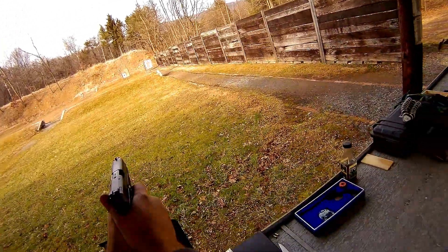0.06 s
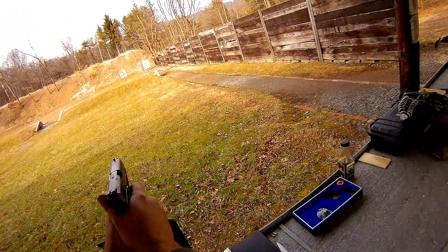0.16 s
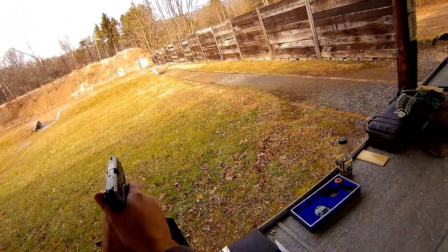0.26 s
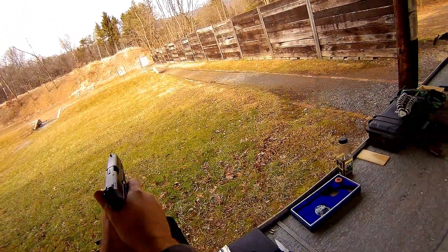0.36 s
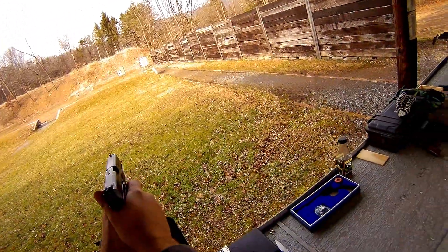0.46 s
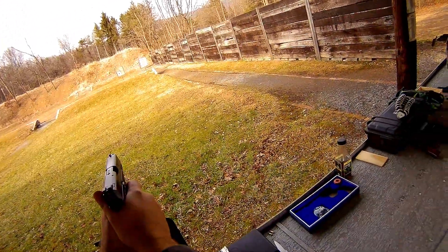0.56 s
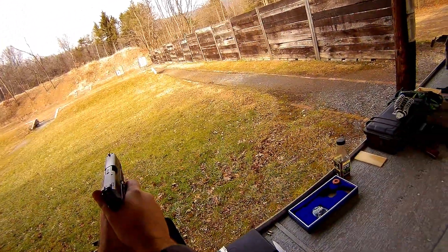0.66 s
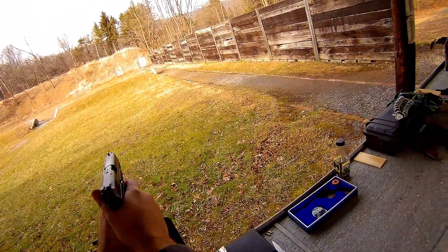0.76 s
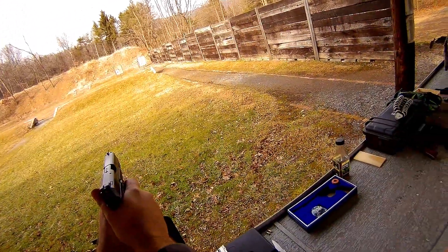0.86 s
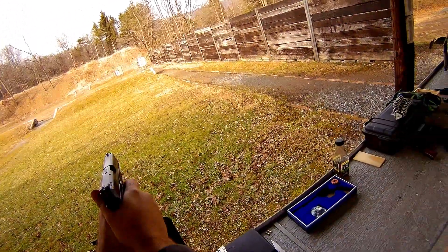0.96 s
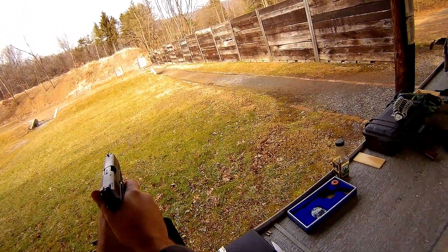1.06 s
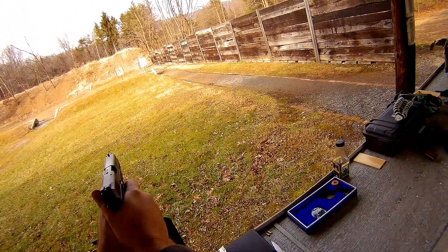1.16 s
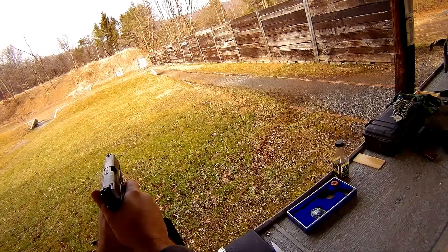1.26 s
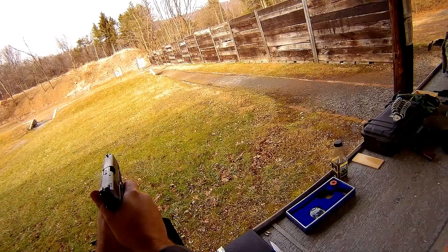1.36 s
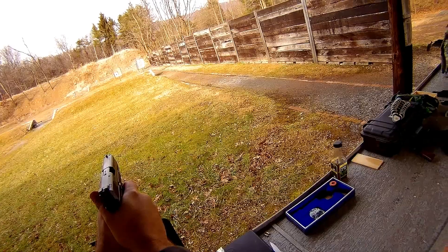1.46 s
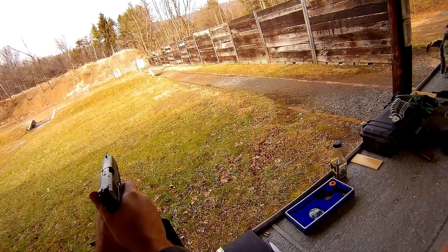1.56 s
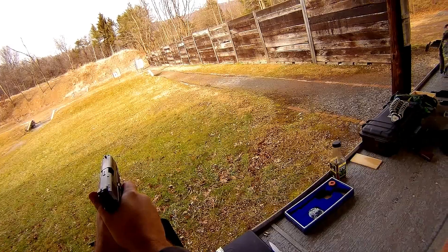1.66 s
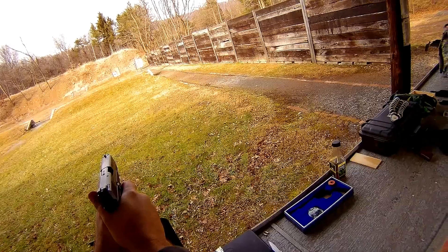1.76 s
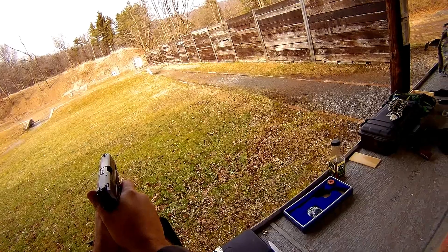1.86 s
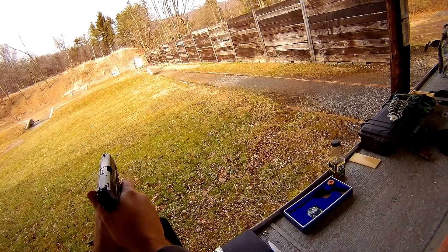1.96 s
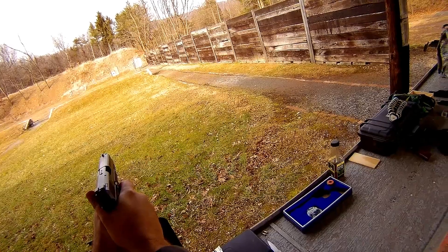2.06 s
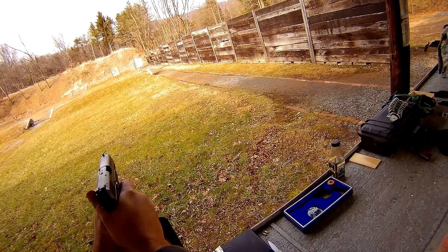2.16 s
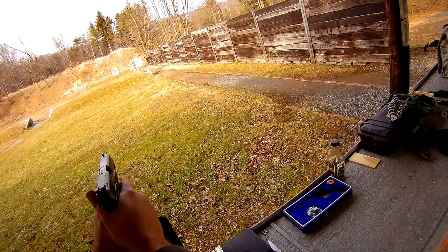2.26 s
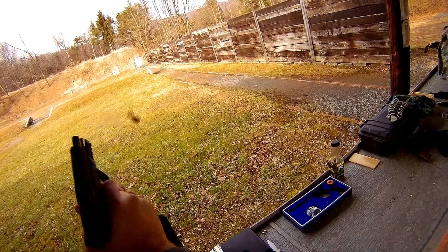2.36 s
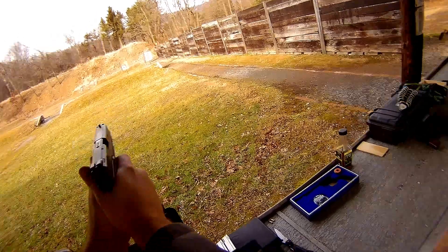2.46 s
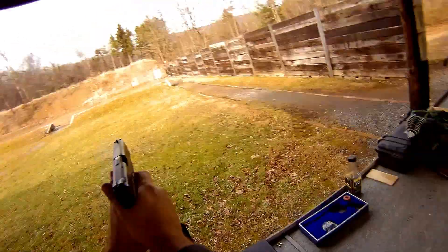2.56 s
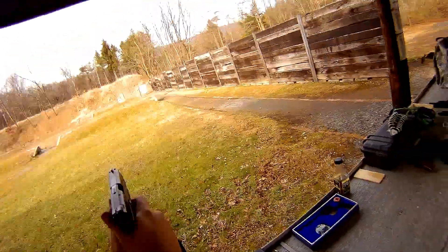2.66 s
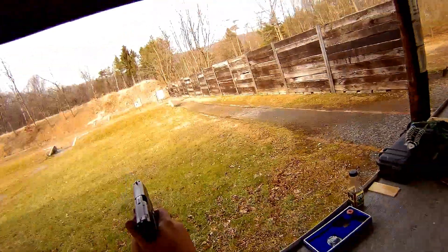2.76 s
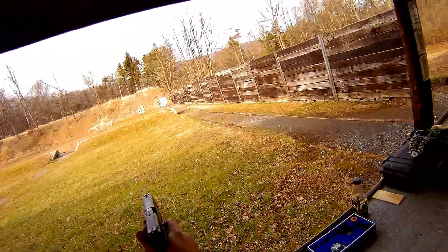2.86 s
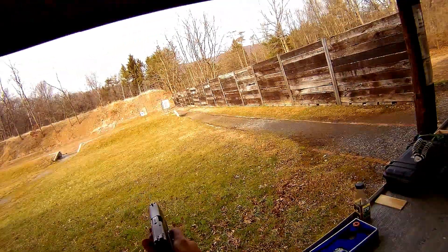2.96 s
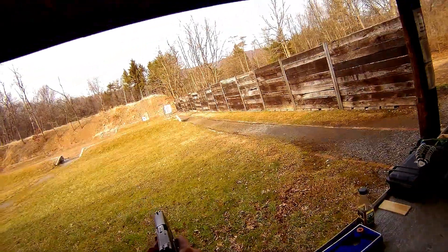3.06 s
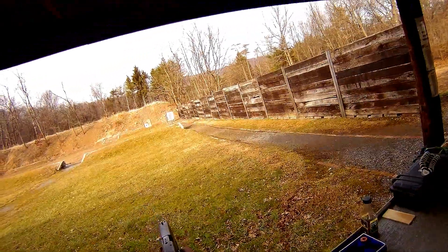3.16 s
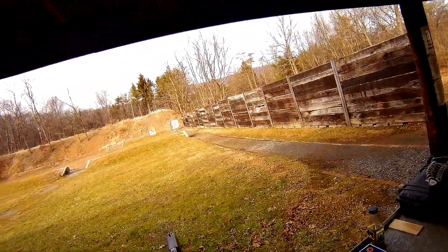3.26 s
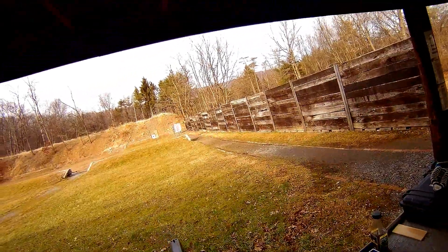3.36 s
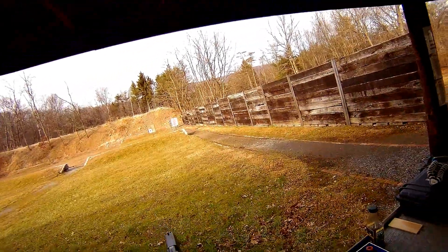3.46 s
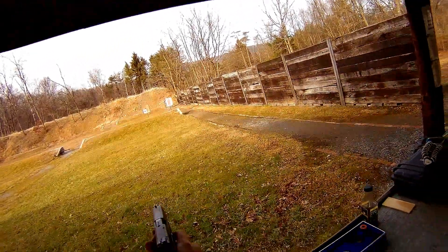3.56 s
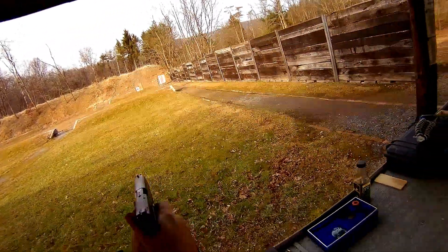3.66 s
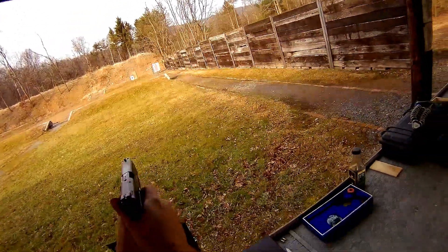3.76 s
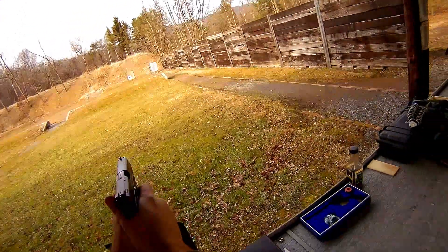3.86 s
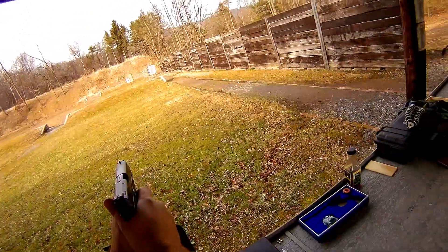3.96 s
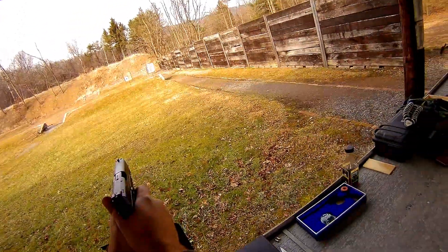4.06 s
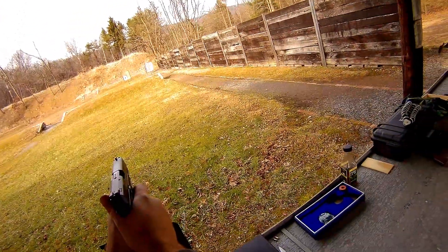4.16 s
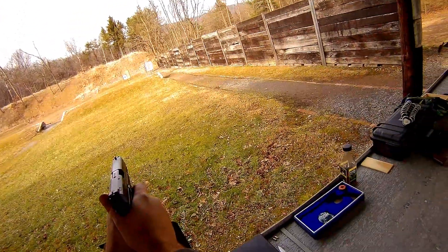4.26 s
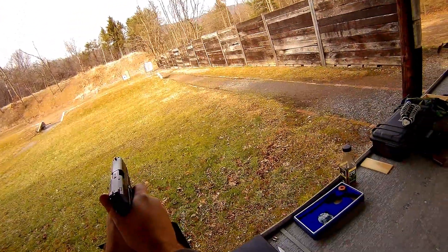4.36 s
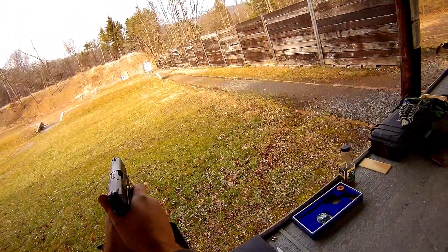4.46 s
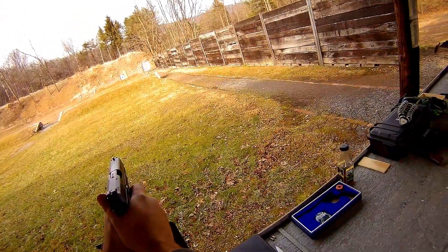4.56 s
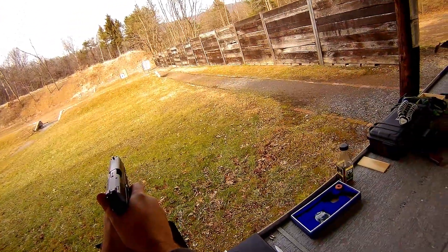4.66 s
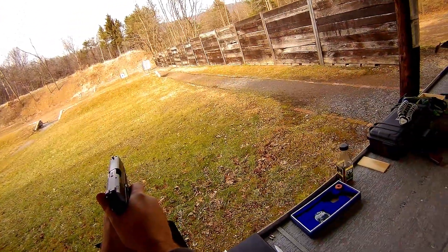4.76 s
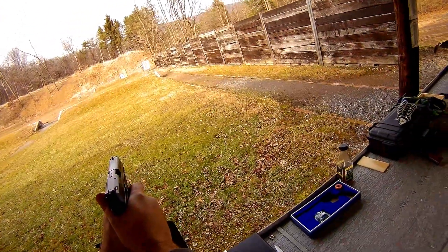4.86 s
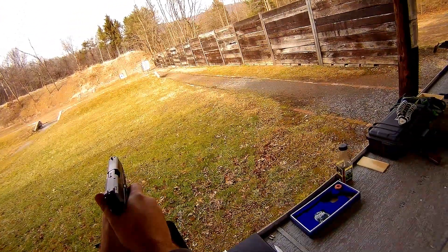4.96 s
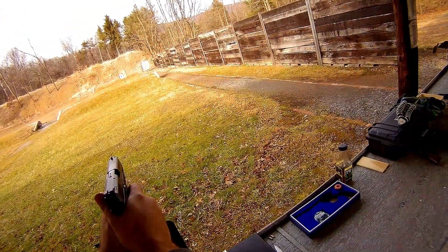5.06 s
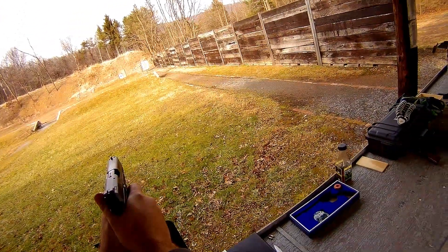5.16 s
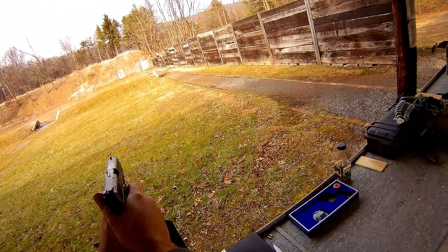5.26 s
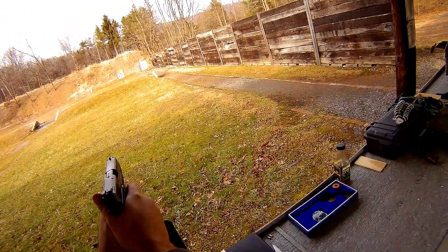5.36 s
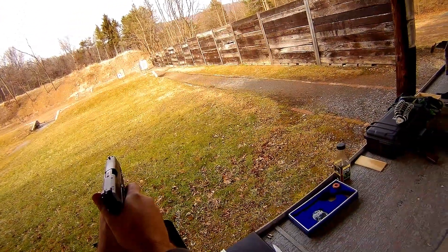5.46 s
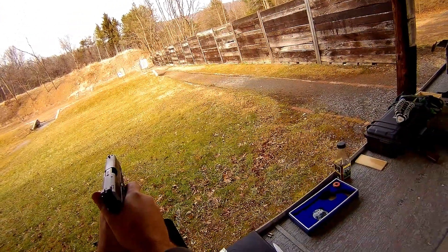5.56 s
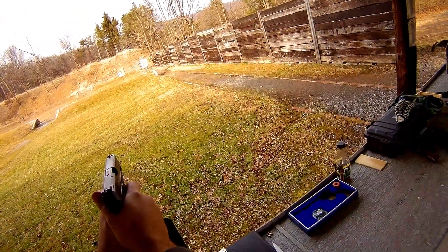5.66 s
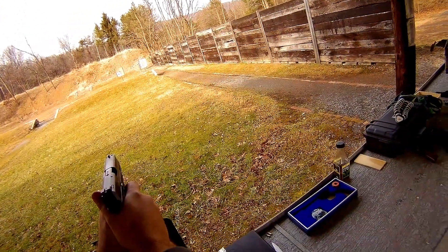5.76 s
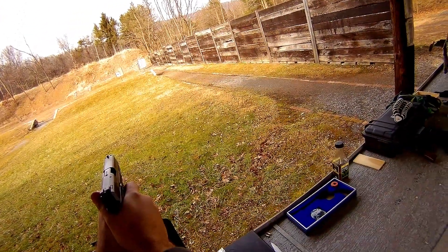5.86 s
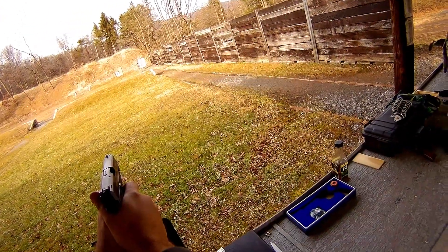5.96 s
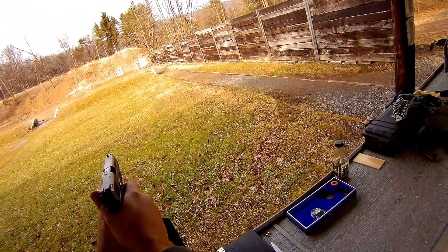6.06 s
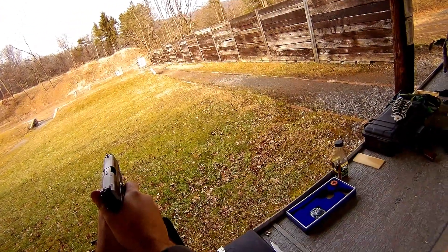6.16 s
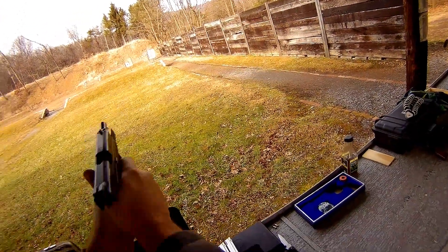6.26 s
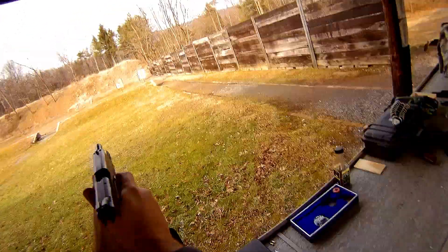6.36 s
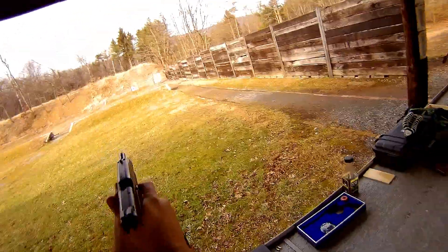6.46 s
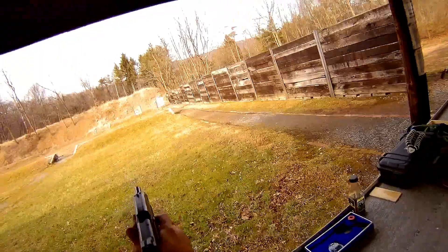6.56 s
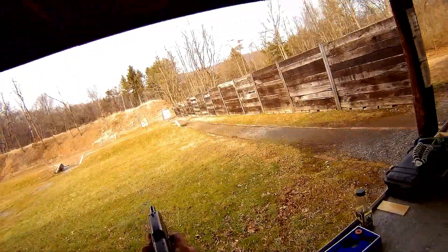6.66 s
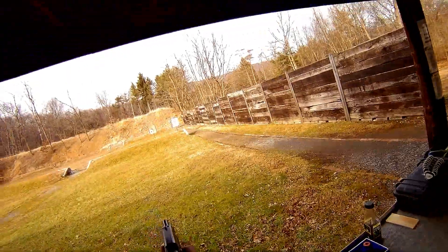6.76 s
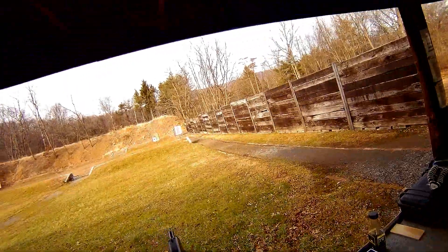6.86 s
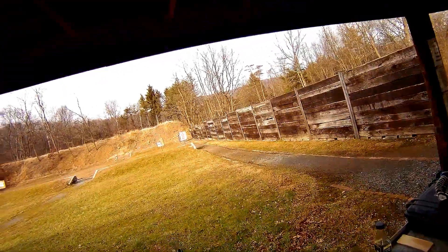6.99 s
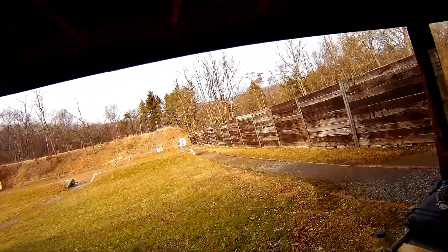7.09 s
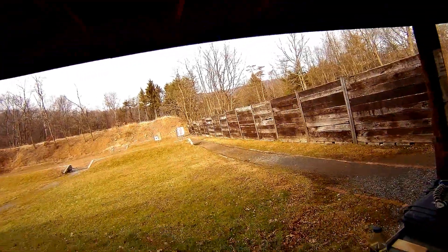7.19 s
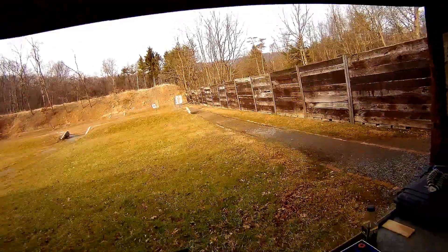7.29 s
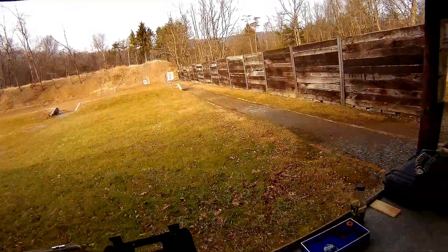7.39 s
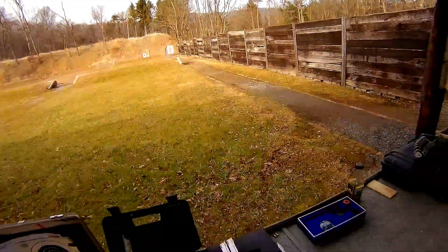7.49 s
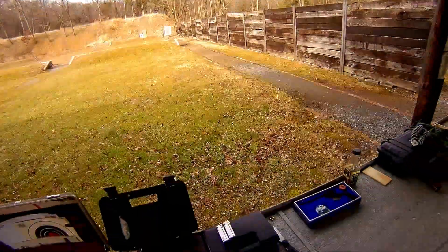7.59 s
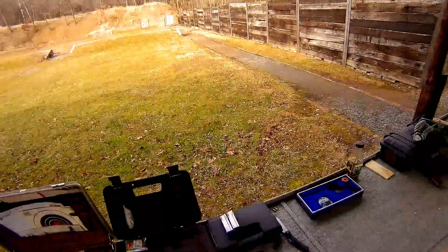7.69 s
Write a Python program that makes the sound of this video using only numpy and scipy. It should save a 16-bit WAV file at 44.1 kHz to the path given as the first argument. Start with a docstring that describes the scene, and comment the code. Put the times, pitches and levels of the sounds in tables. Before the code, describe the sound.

The fading echo of an earlier shot opens the scene at an outdoor range. A brass casing clicks and bounces on concrete during the first second, followed by a faint rattle of loose gear. At about 2.3 seconds a pistol fires close by, a loud, sharp report that overloads the microphone, slaps back from the shelter and fence, and rolls away over the hills for roughly two seconds. A casing clinks lightly between 3 and 4 seconds. From about 4.6 to 5.7 seconds come soft scuffs of shoes and clothing and small knocks over quiet air. A second shot cracks at about 6.2 seconds with the same long echo. As it fades, a casing lands with a sharp click at 7 seconds, a short knock follows at 7.3 with a few small ticks, and gear clatters briefly at about 7.7 seconds.

```python
"""Pistol shots at an outdoor range

Slow single shots, fired from under a roof, overload a head-worn microphone. Each report reflects
from the shelter and a long plank fence, then rolls away, scattered by the wooded hills.
Brass cases strike the concrete and ring in their free modes. Between shots the shooter shifts his
stance and gear clatters, over quiet air and a faint, distant drone."""
import sys
import numpy as np
from scipy import signal
from scipy.fft import rfft, irfft, next_fast_len
from scipy.io import wavfile
from scipy.ndimage import map_coordinates

SR = 44100
rng = np.random.default_rng(int(sys.argv[2]) if len(sys.argv) > 2 else 0)


def store_pcm(level_fs):
    """Save levels as 16-bit WAV."""
    pcm = np.round(np.clip(level_fs, -1, 1) * 32767).astype(np.int16)
    wavfile.write(sys.argv[1], SR, np.atleast_2d(pcm).T)


N = 340878
T = np.arange(N) / SR


def amp(db):
    """Amplitude ratio of a level in decibels."""
    return 10 ** (np.asarray(db) / 20)


def unit(x):
    """Normalisation to an rms of 1."""
    return x / np.sqrt(np.mean(x ** 2) + 1e-20)


def along(points, hz):
    """Interpolation of (frequency [Hz], value) points on a logarithmic frequency axis."""
    freqs, values = np.transpose(points)
    return np.interp(np.log(hz + 1), np.log(freqs + 1), values)


def filtered(x, response):
    """Linear filtering: the spectrum of x times a frequency response."""
    size = next_fast_len(len(x) + SR // 4)
    return irfft(rfft(x, size) * response(np.fft.rfftfreq(size, 1 / SR)), size)[:len(x)]


def noise(spectrum, size=N):
    """Spectral shaping: coloured noise of rms 1."""
    return unit(filtered(rng.standard_normal(size), lambda hz: amp(along(spectrum, hz))))


def wobble(rate, size=N):
    """Random modulation: a smooth curve through `rate` random values a second."""
    return map_coordinates(rng.standard_normal(size // 10), [T[:size] * rate], mode="wrap")


def fading(x, decay):
    """Frequency-dependent damping: each band falls 60 dB in its own decay time (t60)."""
    hz, t, bands = signal.stft(x, SR, nperseg=256)
    loss = amp(-60 * t / along(decay, hz)[:, None])
    return signal.istft(bands * loss, SR, nperseg=256)[1][:len(x)]


def add(track, start_s, x):
    """Superposition of x on the track from a given time."""
    start = round(start_s * SR)
    x = x[max(-start, 0):max(N - start, 0)]
    track[max(start, 0):][:len(x)] += x


def stroke(t, rise, t60):
    """An envelope of linear rise and exponential decay."""
    return np.minimum(t / rise, 1) * amp(-60 * np.maximum(t - rise, 0) / t60)


# Shots; the first precedes the start, so only its echo is heard: (time [s], level [dB])
SHOT_TIMES = [(-1.18, 0), (2.3205, 0), (6.1597, 0)]


def pistol(drift_rad_per_s=.6, terrain_db=.7):
    """Decorrelation: every shot meets the same walls and terrain; moving air alters the long paths."""
    out = np.zeros(N)
    near = muzzle_blast() + fence_boom()
    shared_echo = hill_echo()
    terrain = amp(terrain_db * wobble(rate=22))
    drift = np.minimum(drift_rad_per_s * T, np.pi / 2)
    for start, db in SHOT_TIMES:
        echo = np.cos(drift) * shared_echo + np.sin(drift) * hill_echo()
        add(out, start, amp(db) * (near + terrain * echo))
    return out


# Muzzle blast under the roof: (frequency [Hz], spectral level [dB])
BLAST_SPECTRUM = [(25, -10), (55, -15), (85, -3), (170, -13.5), (280, -5), (420, -3), (570, 3), (1100, -.5),
                  (1400, -.5), (1750, -6), (2300, -10), (3500, -3), (4500, -7), (6200, -5), (8000, -16),
                  (10000, -21), (16000, -23)]
# Reverberation of the shelter: (frequency [Hz], decay time [s])
SHELTER_DECAY = [(60, .24), (300, .19), (600, .168), (1300, .138), (2500, .088), (3800, .066), (6000, .074),
                 (14000, .16)]
# Single reflections from walls and posts: (delay [s], level [dB], pulse width [ms])
REFLECTIONS = [(.0305, 2, .27), (.0355, 2, .27), (.057, -1, .45), (.088, -8, .35), (.1355, -11, .17),
               (.1435, -17, .17), (.169, -19, .17), (.2205, -19, .12), (.245, -21, .15)]


def muzzle_blast(blast_db=9.5, attack_s=.0008, spray_db=3, spray_loss_db_per_ms=90, spray_t60=.018):
    """Reverberation and reflection: the blast fills the shelter; walls and posts return pulses."""
    out = amp(blast_db) * fading(noise(BLAST_SPECTRUM), SHELTER_DECAY) * (1 - np.exp(-T / attack_s))
    t = T[:SR // 8]
    for delay, db, width_ms in REFLECTIONS:
        u = (T - delay) * 1000 / width_ms  # time in pulse widths
        out -= amp(db) * (1 - u * u / 2) * np.exp(-u * u / 4)
        # Rough planks scatter a short spray; a wide, dull pulse scatters less.
        scatter_db = db + spray_db - spray_loss_db_per_ms * width_ms
        add(out, delay, amp(scatter_db - 60 * t / spray_t60) * noise(BLAST_SPECTRUM, len(t)))
    return out


def fence_boom(start_hz=600, end_hz=140, sink_s=.085, width_hz=185, cutoff_hz=98,
               level_db=-26.7, hold_s=.25, t60=1.15):
    """Successive reflection: returns from ever farther along the fence merge into a sinking boom."""
    centre_hz = end_hz + (start_hz - end_hz) * np.exp(-T / sink_s)
    phase = 2 * np.pi * np.cumsum(centre_hz) / SR
    band = wobble(width_hz) * np.cos(phase) + wobble(width_hz) * np.sin(phase)
    # The fence returns no deep bass.
    band = filtered(band, lambda hz: (hz / cutoff_hz) ** 5 / (1 + (hz / cutoff_hz) ** 5))
    flutter = amp(2 * wobble(rate=35))
    envelope = amp(level_db - 60 * np.maximum(T - hold_s, 0) / t60)
    return envelope * unit(band * flutter)


# Echo of the hills: (frequency [Hz], spectral level [dB])
ECHO_SPECTRUM = [(40, -44), (85, -34), (130, -19.5), (200, -20.5), (300, -14), (420, -4.5), (600, .8),
                 (850, -2.8), (1050, -6.8), (1400, -8.8), (2400, -20.8), (3000, -25.5), (3700, -21),
                 (4500, -25), (5800, -22.3), (7800, -31), (9200, -17), (10500, -14), (11800, -34),
                 (16000, -45)]
# Decay of that echo in air: (frequency [Hz], decay time [s])
ECHO_DECAY = [(100, 2.6), (300, 2.8), (550, 3.1), (1200, 2.6), (2500, 2.08), (3700, 2.0), (6000, 1.17),
              (9000, .72), (15000, .85)]
# Faint hiss that trails the echo: (frequency [Hz], spectral level [dB])
HISS_SPECTRUM = [(300, -30), (2000, -12), (7000, -17), (9500, 1), (16000, 1)]


def hill_echo(ground_db=-20.8, ground_rise_s=.035, slope_db=-12.1, slope_delay_s=.285,
              slope_rise_s=.028, hiss_db=-42.5, hiss_t60=7):
    """Scattering and absorption: countless trunks spread the report; the air takes the treble first."""
    # Nearby ground answers at once, the wooded slope later.
    ground = amp(ground_db) * (1 - np.exp(-T / ground_rise_s))
    slope = amp(slope_db) / (1 + np.exp((slope_delay_s - T) / slope_rise_s))
    roll = fading(noise(ECHO_SPECTRUM), ECHO_DECAY) * (ground + slope)
    flutter = amp(1.3 * wobble(rate=130))
    hiss = amp(hiss_db - 60 * T / hiss_t60) * noise(HISS_SPECTRUM)
    return roll * flutter + hiss


def skitter(start_s=.6675, hop_s=.1355, shrink=.71, loss_db=6, click_db=-59, ring_db=-49.5,
            cutoff_hz=12000):
    """Inelastic bouncing: three landings of one case, with shrinking hops and falling levels."""
    times = [start_s + hop_s * sum(shrink ** j for j in range(k)) for k in range(3)]
    return [(s, click_db - loss_db * k, ring_db - loss_db * k, cutoff_hz) for k, s in enumerate(times)]


# Cases landing: (time [s], click level [dB], ring level [dB], click cutoff [Hz])
LANDINGS = [(.1537, -26.5, -56, 1800), (.4774, -40, -45, 4000), (.696, -53, -57, 7000),
            (3.103, -52, -67, 8000), (3.3764, -28, -49, 4000), (3.888, -52, -67, 20000),
            (6.9926, -16.5, -57, 20000), (7.0524, -42, -66, 7000), (7.3737, -45, -74, 14000),
            (7.5658, -32, -44, 1500)]
# Impact of brass on concrete: (frequency [Hz], spectral level [dB])
CLICK_SPECTRUM = [(2000, -45), (3200, -18), (4000, -3), (4700, 3), (6800, -7), (8200, -5), (10000, 4),
                  (16000, -1)]
# Modes of a brass case: (frequency [Hz], level [dB], decay time [s])
BRASS_MODES = [(3980, -12, .06), (4450, -11, .03), (4930, -13, .03), (8010, 0, .13), (8091, -5, .37),
               (8161, -6, .28), (13850, 3, .12), (14380, 2, .21)]


def brass_cases(tumble_db=2.5, click_t60=.022):
    """Impact excitation: each landing clicks and rings the modes of a short, tumbling tube."""
    out, t = np.zeros(N), T[:SR]
    for start, click_db, ring_db, cutoff_hz in LANDINGS + skitter():
        click = filtered(rng.standard_normal(SR),
                         lambda hz: amp(along(CLICK_SPECTRUM, hz)) / (1 + (hz / cutoff_hz) ** 2))
        ring = np.zeros(SR)
        for mode_hz, db, t60 in BRASS_MODES:
            envelope = amp(db + rng.normal(0, 1.5) - 60 * t / t60)
            ring += envelope * np.sin(2 * np.pi * (mode_hz * t + rng.random()))
        ring *= amp(ring_db + tumble_db * wobble(rate=90, size=SR))
        add(out, start, amp(click_db - 60 * t / click_t60) * unit(click) + ring)
    return out


# Gear clattering on the bench: (frequency [Hz], spectral level [dB])
CLATTER_SPECTRUM = [(150, -36), (450, -18), (900, -10), (1340, 0), (1700, 0), (2300, -10), (3000, -13),
                    (3900, -7), (5500, -9), (8000, -17), (10000, -15), (16000, -14)]


def bench_clatter(start_s=7.6995, level_db=-15, swell_db=16, swell_s=.012, rough_db=2.5):
    """Amplitude-modulated noise: a rough rattle of gear starts abruptly and swells."""
    out, t = np.zeros(N), T[:SR // 2]
    envelope_db = level_db - swell_db * np.exp(-t / swell_s)
    envelope_db += rough_db * wobble(rate=450, size=len(t))
    add(out, start_s, amp(envelope_db) * noise(CLATTER_SPECTRUM, len(t)))
    return out


# Knocks of handling: (time [s], level [dB], frequency [Hz], decay time [s], tick level [dB])
HANDLING_KNOCKS = [(1.868, -62, 1090, .12, -85), (5.026, -46, 680, .06, -64), (5.034, -47, 235, .12, -85),
                   (5.474, -51, 240, .11, -72), (7.2595, -13.5, 1080, .03, -32)]


def handling(attack_s=.003, tick_t60=.025, tick_cutoff_hz=4300):
    """Damped oscillation: each knock sounds one mode and a small tick."""
    out, t = np.zeros(N), T[:SR // 2]
    for start, db, mode_hz, t60, tick_db in HANDLING_KNOCKS:
        envelope = amp(db - 60 * t / t60) * (1 - np.exp(-t / attack_s))
        body = envelope * np.sin(2 * np.pi * mode_hz * t)
        tick = filtered(rng.standard_normal(len(t)),
                        lambda hz: hz / (hz + 900) / (1 + (hz / tick_cutoff_hz) ** 12))
        add(out, start, body + amp(tick_db - 60 * t / tick_t60) * unit(tick))
    return out


# Scuffs of shoes and clothing: (time [s], level [dB], rise time [s], centre frequency [Hz])
SCUFF_STROKES = [(4.612, -43.5, .036, 560), (4.725, -56, .01, 1400), (4.8, -62, .015, 900),
                 (5.263, -58, .004, 4000), (5.285, -54, .012, 2400), (5.355, -61, .005, 2400),
                 (5.388, -60, .005, 2000), (5.89, -72, .012, 800), (7.398, -40, .018, 5000)]


def scuffs(t60=.11):
    """Sliding friction: shoes and clothing rub in short strokes."""
    out, t = np.zeros(N), T[:SR // 2]
    for start, db, rise, centre_hz in SCUFF_STROKES:
        add(out, start, amp(db) * stroke(t, rise, t60) * friction(len(t), centre_hz))
    return out


# Rubbing surfaces: (frequency [Hz], spectral level [dB])
FRICTION_SPECTRUM = [(200, -10), (450, -6), (800, 0), (1500, -1), (2500, -8), (6000, -6), (8000, -13),
                     (10500, -2), (16000, -3)]


def friction(size, centre_hz, grain_db=3, octaves=1.5):
    """Friction noise: tiny uneven grains, weighted towards a band around one frequency."""
    def response(hz):
        detuning = np.log2((hz + 1) / centre_hz) / octaves
        return amp(along(FRICTION_SPECTRUM, hz)) / (1 + detuning ** 4)

    grains = rng.standard_normal(size) * amp(grain_db * wobble(rate=500, size=size))
    return unit(filtered(grains, response))


# Jolts of loose gear: (time [s], level [dB])
GEAR_JOLTS = [(.842, -57), (.927, -52), (.988, -57), (1.048, -57), (1.1, -46), (1.14, -52), (1.172, -50),
              (1.446, -65), (1.828, -69), (5.526, -49), (5.546, -50), (5.718, -69)]
# Resonances of that gear: (frequency [Hz], half-width [Hz], level [dB])
GEAR_RESONANCES = [(1670, 65, 0), (1880, 90, -12), (2110, 60, -9), (2830, 100, -19), (3800, 250, -23)]


def loose_gear(rise_s=.004, t60=.12, scrape_db=-6, scrape_hz=2500):
    """Resonance: each jolt scrapes the gear and sets it ringing in narrow bands."""
    def response(hz):
        return sum(amp(db) / (1 + ((hz - peak) / width) ** 2) for peak, width, db in GEAR_RESONANCES)

    out, t = np.zeros(N), T[:SR // 2]
    for start, db in GEAR_JOLTS:
        ring = unit(filtered(rng.standard_normal(len(t)), response))
        scrape = amp(scrape_db) * friction(len(t), scrape_hz)
        add(out, start, amp(db) * stroke(t, rise_s, t60) * unit(ring + scrape))
    return out


def roof_reverb(x, wet_db=-6, t60=.16, build_s=.012):
    """Diffuse reflection: roof and floor add a short tail to small sounds."""
    t = T[:SR // 2]
    tail = rng.standard_normal(len(t)) * amp(-60 * t / t60) * np.minimum(t / build_s, 1) ** 2
    return x + amp(wet_db) * signal.fftconvolve(x, tail / np.linalg.norm(tail))[:N]


# Still air and hiss: (frequency [Hz], spectral level [dB])
AMBIENT_SPECTRUM = [(20, 8), (45, 4), (86, 2.5), (158, -13), (262, -12.5), (660, -12), (1090, -20),
                    (2260, -30), (8000, -29), (9500, -16), (12000, -12), (15000, -13)]
# Gaussian swells of a far drone: (peak time [s], half-width [s], level [dB], frequency [Hz])
DRONE_SWELLS = [(1.8, .9, -68, 102.3), (4.25, .42, -65.5, 114)]


def outdoors(air_db=-58.6, octave_db=-13, waver_hz=1.5):
    """Ambient noise: quiet air and a distant drone with slight frequency modulation."""
    out = amp(air_db) * noise(AMBIENT_SPECTRUM)
    for peak_s, half_width, db, hz in DRONE_SWELLS:
        phase = 2 * np.pi * np.cumsum(hz + waver_hz * wobble(rate=5)) / SR
        swell = amp(db) * np.exp(-((T - peak_s) / half_width) ** 2 / 2)
        out += swell * unit(np.sin(phase) + amp(octave_db) * np.sin(2 * phase))
    return out


def scene():
    """Superposition of shots, small sounds under the roof, dry knocks and clatter, and open air."""
    shots = pistol()
    under_roof = roof_reverb(brass_cases() + scuffs() + loose_gear())
    return (shots + under_roof + handling() + bench_clatter() + outdoors())[None]


# Treble roll-off that dulls the whole sound: (frequency [Hz], gain [dB])
TREBLE_ROLLOFF = [(20, 0), (6500, 0), (8200, -5), (9500, -16), (12000, -22), (16000, -25)]


def record(dry, positive_limit=.65, negative_limit=1.4, coupling_hz=22, rail=.94, top_hz=15900):
    """Asymmetric saturation: the microphone overloads sooner upward than downward."""
    x = dry[0]
    limit = np.where(x > 0, positive_limit, negative_limit)
    x = x / (1 + np.abs(x / limit) ** 3) ** (1 / 3)
    x = filtered(x, lambda hz: 1j * hz / (coupling_hz + 1j * hz))  # AC coupling recentres the wave
    x = np.clip(x, -rail, rail)  # the amplifier clips
    x = filtered(x, lambda hz: amp(along(TREBLE_ROLLOFF, hz)))
    return filtered(x, lambda hz: 1 / (1 + (hz / top_hz) ** 120))[None]


dry = scene()
out = record(dry)
store_pcm(out)
```